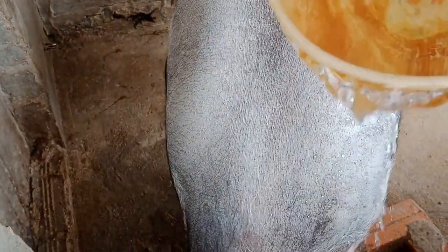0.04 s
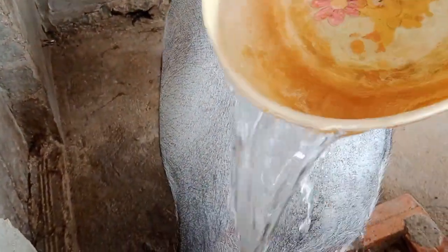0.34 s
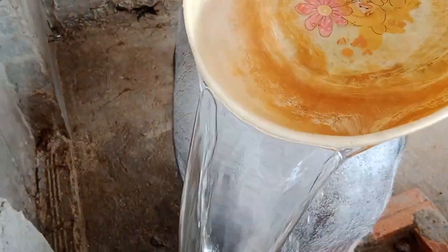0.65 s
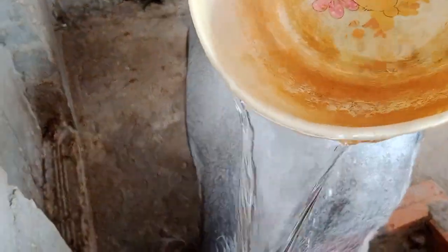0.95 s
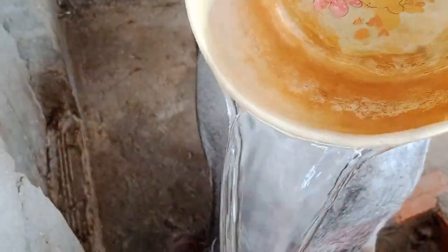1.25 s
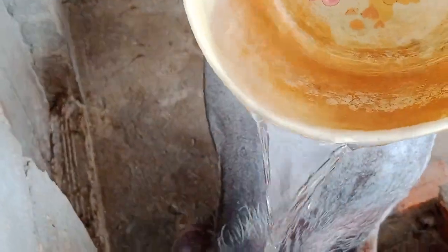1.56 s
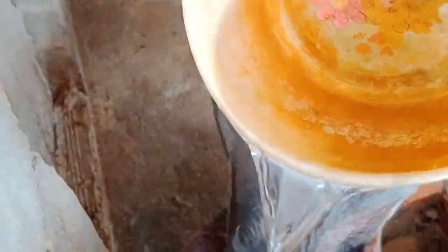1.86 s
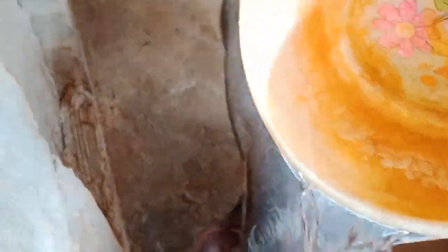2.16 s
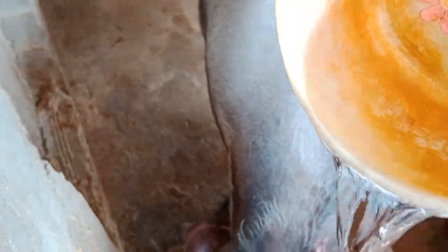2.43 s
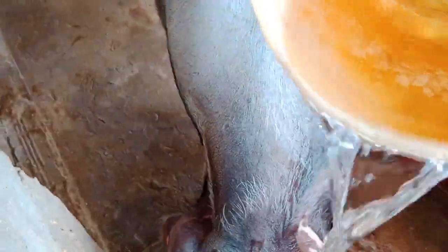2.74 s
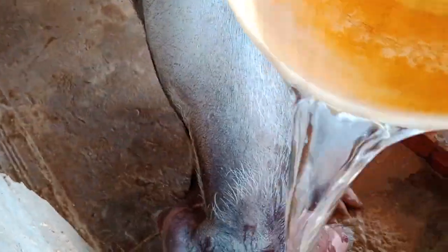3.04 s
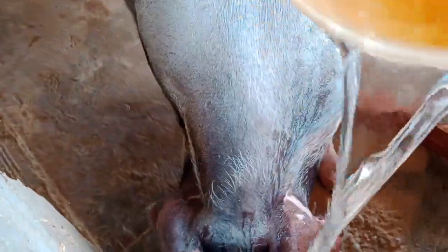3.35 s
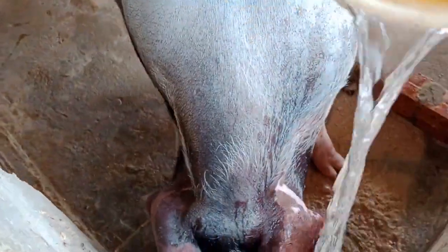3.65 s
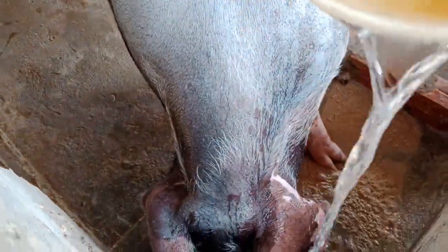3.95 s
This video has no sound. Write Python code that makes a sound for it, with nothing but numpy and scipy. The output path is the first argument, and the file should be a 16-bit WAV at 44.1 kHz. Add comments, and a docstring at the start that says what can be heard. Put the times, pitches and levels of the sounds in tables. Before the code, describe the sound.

Close, uneven splashing of water tipped from a basin over a pig onto concrete.

```python
"""Water sloshes and drums on a pig's back, tipped from a basin close by in a concrete pen.
It starts softly, then lands as a sheet of tiny impacts that splatter and spray off the hide.
After about two seconds the sheet breaks into gushes and ropes. Trapped air plops and gurgles,
lumps of water slap and single drops tick on the floor. The basin rings and the walls echo briefly."""
import sys
import numpy as np
from scipy import signal
from scipy.fft import rfft, irfft
from scipy.io import wavfile
from scipy.ndimage import uniform_filter1d

SR = 44100
rng = np.random.default_rng(int(sys.argv[2]) if len(sys.argv) > 2 else 0)


def inscribe(sig):
    """Save sig as 16-bit PCM at rate SR to the path in sys.argv[1].

    A 1-D sig is mono; a 2-D sig holds one channel per row.
    Samples are clipped to [-1, 1] before scaling.
    """
    pcm = np.round(np.clip(np.atleast_2d(sig).T, -1, 1) * 32767)
    wavfile.write(sys.argv[1], SR, pcm.astype(np.int16))


N = 176400

# The tone of the quiet air and of the four water layers. Each row: frequency in Hz, relative level in dB.
AIR_TONE = [(25, 2), (600, -2), (4800, -30), (15000, -9)]
DRUM_TONE = [(30, -23), (70, -17), (120, -11.5), (165, -8), (260, 6), (340, 3.5), (430, -5.5), (600, -1.5),
             (1000, -46)]
SLOSH_TONE = [(250, -58), (450, -18.5), (600, -1), (700, -2), (900, 2), (1050, 1.5), (1250, -1.5),
              (1550, -10.5), (1900, -7.5), (3000, -45)]
SPLATTER_TONE = [(1000, -29), (1600, -6.5), (1800, -5), (2000, 0.5), (2350, -6.5), (2800, -3), (3300, -7.5),
                 (3850, -6), (4400, -10), (6500, -34)]
SPRAY_TONE = [(2500, -13), (4000, -17), (4850, -15.5), (6200, -9), (6900, -2.5), (7600, -1.5), (8700, -1.5),
              (9400, -7.5), (10100, -5), (11400, -10.5), (12800, -8), (13800, -11.5), (15300, -12.5)]
# How each water layer swells and fades. Each row: time in seconds, relative level in dB.
DRUM_LEVEL = [(0.282, -100), (0.311, -65), (0.332, -82), (0.41, -53), (0.591, -60), (0.711, -89),
              (0.781, -86), (0.817, -50.5), (1.01, -58), (1.085, -80), (1.165, -57), (1.404, -85),
              (1.424, -60.5), (1.479, -58.5), (1.554, -77), (1.599, -55.5), (2.028, -53), (2.118, -60),
              (2.207, -92), (2.223, -57), (2.287, -61), (2.44, -93.5), (2.541, -56.5), (2.651, -87.5),
              (2.761, -64), (2.821, -74), (2.858, -53.5), (2.931, -81), (3.06, -55.5), (3.178, -64.5),
              (3.24, -99), (3.445, -53.5), (3.604, -81), (3.633, -53.5), (3.755, -52.5), (3.81, -73),
              (3.95, -94), (3.993, -60.5)]
SLOSH_LEVEL = [(0.002, -71), (0.12, -62.5), (0.227, -94), (0.376, -50), (0.456, -40.5), (0.641, -60.5),
               (0.671, -57.5), (0.721, -75), (0.801, -49.5), (0.935, -41), (1.055, -44.5), (1.125, -51.5),
               (1.19, -38), (1.404, -55), (1.419, -40), (1.484, -39.5), (1.564, -48), (1.608, -37),
               (1.653, -51), (1.759, -40.5), (1.823, -50), (1.858, -43.5), (2.128, -55.5), (2.289, -45),
               (2.332, -65), (2.348, -52), (2.502, -61), (2.529, -40.5), (2.677, -72), (2.718, -45),
               (2.826, -63.5), (2.842, -47), (2.975, -80), (2.994, -49.5), (3.115, -50), (3.199, -86.5),
               (3.312, -84.5), (3.329, -46.5), (3.47, -48), (3.517, -60), (3.57, -50.5), (3.609, -65.5),
               (3.697, -38), (3.776, -56.5), (3.81, -82), (3.945, -86), (3.993, -49.5)]
SPLATTER_LEVEL = [(0.002, -71), (0.292, -100), (0.355, -68), (0.368, -53.5), (0.573, -47.5), (0.736, -93),
                  (0.777, -51), (0.895, -51), (1.01, -64), (1.029, -45.5), (1.125, -54), (1.275, -46.5),
                  (1.379, -59), (1.449, -46), (1.569, -55.5), (1.898, -52.5), (2.083, -61.5), (2.098, -51),
                  (2.133, -68.5), (2.273, -46), (2.332, -72), (2.357, -58.5), (2.407, -55), (2.432, -72),
                  (2.527, -52), (2.627, -69), (2.661, -55.5), (2.686, -61), (2.768, -51), (2.796, -79),
                  (2.856, -58), (2.901, -76), (2.94, -50), (2.971, -66), (3.18, -55), (3.29, -80.5),
                  (3.37, -66.5), (3.495, -53), (3.546, -62), (3.583, -51), (3.609, -66), (3.695, -47.5),
                  (3.82, -82.5), (3.864, -66), (3.979, -78)]
SPRAY_LEVEL = [(0.036, -68), (0.055, -59.5), (0.072, -74.5), (0.138, -66), (0.287, -85.5), (0.312, -64.5),
               (0.352, -67), (0.358, -45.5), (0.491, -47.5), (0.506, -38), (0.546, -47.5), (0.558, -39),
               (0.596, -52.5), (0.666, -51.5), (0.701, -64), (0.746, -64), (0.816, -42.5), (0.851, -51),
               (1.045, -43), (1.054, -38), (1.135, -48), (1.26, -39.5), (1.399, -48), (1.434, -41),
               (1.514, -42.5), (1.554, -53.5), (1.625, -43), (1.644, -55), (1.78, -41), (1.818, -57),
               (1.893, -42.5), (2.025, -58.5), (2.036, -45), (2.078, -60), (2.1, -46), (2.133, -63),
               (2.168, -52.5), (2.275, -42), (2.318, -65), (2.346, -66.5), (2.352, -44.5), (2.408, -46.5),
               (2.441, -64.5), (2.476, -45.5), (2.582, -43.5), (2.617, -60), (2.64, -51.5), (2.77, -54.5),
               (2.796, -71), (2.829, -52.5), (2.953, -45.5), (2.976, -66), (3.026, -59), (3.074, -39),
               (3.12, -53), (3.178, -44), (3.23, -60.5), (3.315, -69), (3.345, -54), (3.565, -53.5),
               (3.584, -48), (3.614, -61.5), (3.722, -40), (3.825, -74), (3.864, -55), (3.973, -70),
               (3.985, -54)]
# How long the pen rings. Each row: frequency in Hz, seconds to fade by 60 dB.
PEN_DECAY = [(150, 0.12), (600, 0.11), (1200, 0.11), (3000, 0.11), (8000, 0.045), (15000, 0.18)]
# First echoes off the walls. Each row: delay in seconds, level in dB.
WALL_ECHOES = [(.0128, -17.5), (.027, -21.5)]
# Hollow notes of the basin. Each row: pitch in Hz, width in Hz, level in dB.
BASIN_NOTES = [(324, 49, -16.5), (616.6, 28, 0), (998, 190, -2.5), (1283, 130, -0.5), (1466, 103, 4.5),
               (2085, 44, -5), (2739, 41, 4), (2979, 34, 2.5), (4050, 35, -4.5)]
# Large drops on wet concrete. Each row: start in seconds, peak level in dB.
TICKS = [(0.051, -47), (1.21, -20), (1.4177, -18.5), (2.028, -30), (2.039, -32), (2.351, -32), (2.376, -24),
         (2.391, -43), (2.768, -27.5), (3.577, -28.5), (3.983, -51), (3.687, -26.5), (3.711, -24.5)]
# Lumps of water. Each row: start in seconds, peak level in dB, pitch in Hz, fade time in seconds.
SLAPS = [(.363, -34, 1250, 0.0052), (0.867, -28, 3200, 0.0013), (1.417, -31, 2370, 0.0068),
         (2.636, -35.5, 2240, .005), (2.927, -37.5, 2340, 0.0062), (2.946, -36.5, 2150, .003),
         (3.168, -31.5, 3260, .0029), (3.204, -37.5, 1430, .0043), (3.333, -33, 1010, 0.0043),
         (3.3726, -34, 2280, .005), (3.656, -26, 1380, 0.0056), (3.751, -33, 1205, 0.0033)]
# Air pockets closing. Each row: start in seconds, level in dB, pitch in Hz, length in seconds.
PLOPS = [(0.034, -58, 942, 0.026), (0.098, -55, 994, 0.019), (0.259, -67.5, 601, .03),
         (0.306, -40.5, 948, 0.015), (0.4, -48.5, 270, 0.046), (.435, -45, 201, .07),
         (.515, -47, 205, 0.067), (0.662, -48.5, 1052, 0.02), (0.7768, -29, 1057, 0.0064),
         (.806, -43, 267, 0.051), (0.811, -49.5, 165, 0.14), (1.1537, -15, 940, 0.0046),
         (1.3388, -18.5, 922, .0064), (1.436, -31.5, 810, 0.0042), (1.442, -31.5, 813, 0.014),
         (1.675, -29.5, 523, 0.0058), (2.169, -36, 995, 0.014), (2.277, -37.5, 303, 0.019),
         (2.521, -39.5, 1006, 0.038), (2.582, -38.5, 980, .01), (2.743, -31.5, 953, 0.012),
         (2.802, -51.5, 594, 0.032), (2.836, -42.5, 903, 0.025), (3.047, -47, 236, 0.03),
         (3.105, -25, 424, 0.0024), (3.161, -43.5, 266.5, 0.024), (3.37, -32, 591, 0.023),
         (3.4228, -28.5, 816, 0.0079), (3.4297, -19.5, 450, 0.0035), (3.428, -48.5, 184, 0.018),
         (3.471, -35, 1260, 0.0068), (3.559, -44, 1170, .014), (3.639, -29.5, 387, 0.0055),
         (3.6543, -22, 884, 0.0092), (3.655, -18.5, 1478, 0.0049), (3.6556, -25.5, 2680, .0045),
         (3.692, -16, 848, 0.01), (3.75, -22.5, 576, 0.0034), (3.885, -71, 1300, 0.073)]

TIME = np.arange(N) / SR


def amp(db):
    """Turns decibels into a gain."""
    return 10 ** (np.asarray(db) / 20)


def unit(x):
    """Scales a sound to an average power of 1."""
    return x / np.sqrt(np.mean(x ** 2) + 1e-20)


def look_up(points, hz):
    """Reads between the rows of a frequency table, with octaves evenly spaced."""
    row_hz, value = np.transpose(points)
    return np.interp(np.log(hz + 1), np.log(row_hz + 1), value)


def add(mix, start_s, sound):
    """Mixes a sound in at its start time."""
    part = mix[max(round(start_s * SR), 0):][:len(sound)]
    part += sound[:len(part)]


def colour(x, tone, size=4096):
    """Filters a sound by a tone table, turning it down beyond the table's ends."""
    hz = abs(np.fft.fftfreq(size, 1 / SR))
    closed = [(tone[0][0] / 2, tone[0][1] - 20), *tone, (tone[-1][0] * 2, tone[-1][1] - 20)]
    log_gain = np.log(amp(look_up(closed, hz)))
    taps = np.fft.ifft(np.exp(np.conj(signal.hilbert(log_gain)))).real  # rings only after a hit
    return signal.oaconvolve(x, taps[:size // 2])[:len(x)]


def low_cut(x, hz):
    """Turns down the bass below hz."""
    return signal.sosfilt(signal.butter(2, hz, "high", fs=SR, output="sos"), x)


def local_power(x, size=1800):
    """How strong a sound is from moment to moment."""
    return abs(uniform_filter1d(uniform_filter1d(x ** 2, size), size))


def air(level_db=-97):
    """Quiet air: a faint, steady noise."""
    return amp(level_db) * unit(colour(rng.standard_normal(N), AIR_TONE))


def wall_echoes(x):
    """The walls send back weaker copies a moment later."""
    out = x.copy()
    for delay, db in WALL_ECHOES:
        add(out, delay, amp(db) * x)
    return out


def pen(x, tail_db, gap=20):
    """Many reflections in the concrete pen blur into a short tail."""
    reflections = np.zeros(SR)
    slots = np.arange(SR // 200, SR - gap, gap)
    reflections[slots + rng.integers(0, gap, len(slots))] = rng.choice([-1., 1.], len(slots))
    hz, t, spectrum = signal.stft(reflections, SR, nperseg=256)
    fade = amp(-60 * t / look_up(PEN_DECAY, hz)[:, None])
    tail = signal.istft(spectrum * fade, SR, nperseg=256)[1]
    return x + amp(tail_db) * signal.oaconvolve(x, tail / np.linalg.norm(tail))[:N]


def basin(x, direct=1):
    """The basin, held over the splash, adds its hollow ring to the direct sound."""
    out = direct * x
    for hz, width, db in BASIN_NOTES:
        out = out + amp(db) * signal.lfilter(*signal.iirpeak(hz, hz / width, SR), x)
    return out


def ticks(fade_s=.0014, size=1024):
    """Large drops burst on the floor, as bright as the spray."""
    out, t = np.zeros(N), np.arange(size) / SR
    for start, db in TICKS:
        tick = colour(rng.standard_normal(size) * np.exp(-t / fade_s), SPRAY_TONE)
        add(out, start, amp(db) * tick / abs(tick).max())
    return out


def slaps(width_octaves=0.51, crater_gain=0.5, size=4096):
    """Lumps of water land flat: a smack of noise, with a brief ring from the crater each one makes."""
    out, t, hz = np.zeros(N), np.arange(size) / SR, np.fft.rfftfreq(size, 1 / SR)
    for start, db, pitch, fade_s in SLAPS:
        band = np.exp(-.5 * (np.log2((hz + 1) / pitch) / width_octaves) ** 2) / (1 + (hz / 4500) ** 10)
        noise = unit(irfft(rfft(rng.standard_normal(size)) * band))
        crater = crater_gain * np.sin(2 * np.pi * pitch * t)
        envelope = (1 - np.exp(-t * pitch * 2)) * np.exp(-t / fade_s)
        smack = low_cut(basin((noise + crater) * envelope), hz=200)
        add(out, start, amp(db) * smack / abs(smack).max())
    return out


def plops(swell_cycles=1.51, rise=0.024):
    """Air pockets pinch off where the stream meets the hide; each rings and climbs a little in pitch."""
    out = np.zeros(N)
    for start, db, hz, length in PLOPS:
        progress = np.arange(0, length, 1 / SR) / length
        cycles = hz * length * (progress + rise * (progress ** 2 - progress))
        swell = np.sin(np.pi / 2 * np.minimum(cycles / swell_cycles, 1))
        fade = np.cos(np.pi / 2 * progress ** 2) ** 2
        add(out, start, amp(db) * swell * fade * np.sin(2 * np.pi * cycles))
    return low_cut(out, hz=130)


def impact_share(breakup_s=2.1, rope_share=.5):
    """The whole sheet lands as many small impacts; once it breaks into ropes there are fewer."""
    return np.where(TIME < breakup_s, 1, rope_share)


def shower(low_hz, high_hz, sheet_per_s, ring_cycles, spread_db, pitches=36):
    """Tiny impacts and bubbles ring at many pitches; a few are much louder than the rest."""
    out, rate = np.zeros(N), sheet_per_s * impact_share()
    for hz in np.geomspace(low_hz, high_hz, pitches):
        hits = np.flatnonzero(rng.random(N) < rate / pitches / SR)
        sizes = rng.standard_exponential(N)[hits]
        cycles = np.arange(0, 2 * ring_cycles, hz / SR)
        envelope = (1 - np.exp(-2 * cycles)) * np.exp(-np.pi * cycles / ring_cycles)
        ring = np.sin(2 * np.pi * cycles) * envelope
        for hit, size in zip(hits, sizes):
            add(out, hit / SR, ring * amp(spread_db * min(size, 4)) * hz / low_hz)
    return out


def droplets(sheet_per_s, spread_db, wash, fade_s=.002):
    """Each droplet bursts as a tiny puff of noise, over a steady wash of the finest ones."""
    sizes = np.minimum(rng.standard_exponential(N), 5)
    hits = rng.random(N) < sheet_per_s * impact_share() / SR
    power = signal.lfilter([1], [1, -np.exp(-2 / (fade_s * SR))], amp(2 * spread_db * sizes) * hits)
    return np.sqrt(power / power.mean() + wash) * rng.standard_normal(N)


def spray():
    """Fine droplets burst on hide and floor, some with a pitch of their own."""
    bursts = droplets(sheet_per_s=1500, spread_db=3.1, wash=.3)
    pips = shower(5500, 13000, sheet_per_s=1500, ring_cycles=14, spread_db=2.8)
    hiss = colour(unit(bursts) + .5 * unit(pips), SPRAY_TONE)
    db = np.interp(TIME, *np.transpose(SPRAY_LEVEL))
    return hiss / np.sqrt(local_power(hiss)) * amp(db)


def flow(impacts, tone, levels, gain_db):
    """Gives a shower its tone and level. Thin flows have less direct sound, so they seem more hollow."""
    db = np.interp(TIME, *np.transpose(levels))
    direct = impact_share() * amp(8.5 + 1.09 * (db - db.max()))
    water = colour(basin(impacts, direct), tone)
    power = local_power(water)
    steady = water / np.sqrt(power + 1e-5 * power.mean())
    return steady * amp(gain_db + db)


def pour():
    """The falling water: soft blows on the hide, gurgling pockets, splatter and spray."""
    thuds = shower(50.2, 755, sheet_per_s=1300, ring_cycles=4, spread_db=2.0)
    gurgles = shower(408.3, 2210, sheet_per_s=1800, ring_cycles=13.6, spread_db=3.5)
    splashes = shower(1305, 5364, sheet_per_s=1900, ring_cycles=29.0, spread_db=3.0)
    drum = flow(thuds, DRUM_TONE, DRUM_LEVEL, gain_db=3.5)
    slosh = flow(gurgles, SLOSH_TONE, SLOSH_LEVEL, gain_db=-2)
    splatter = flow(splashes, SPLATTER_TONE, SPLATTER_LEVEL, gain_db=-1)
    return drum + slosh + splatter + spray()


def scene():
    """Quiet air, the pour, and its single plops, slaps and ticks echoing in the pen."""
    blows = wall_echoes(plops() + slaps() + ticks())
    return (air() + pen(pour(), tail_db=-15) + pen(blows, tail_db=-9.5))[None]


def record(dry):
    """The microphone's opening takes out one narrow band of treble; the very top is cut off too."""
    notch_hz, notch_width_hz, top_hz = 4813, 570, 15800
    notched = signal.lfilter(*signal.iirnotch(notch_hz, notch_hz / notch_width_hz, SR), dry)
    high_cut = signal.firwin(511, top_hz, window=("kaiser", 9), fs=SR)
    return signal.oaconvolve(notched, high_cut[None], "same")


dry = scene()
out = record(dry)
inscribe(out)
```